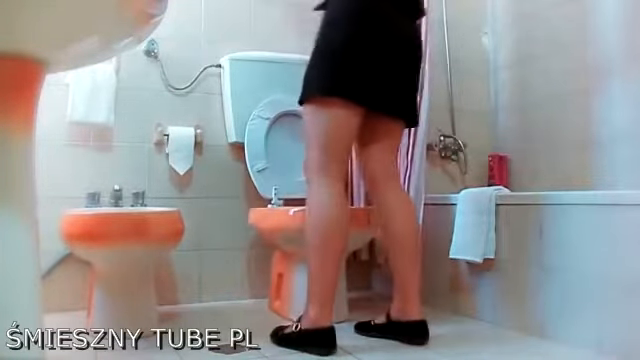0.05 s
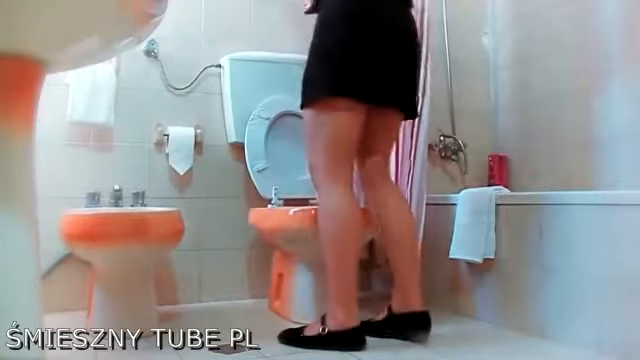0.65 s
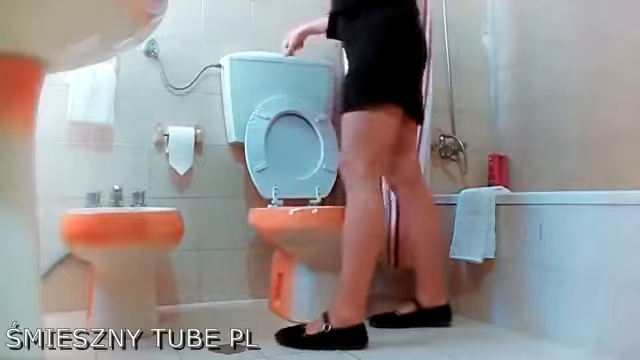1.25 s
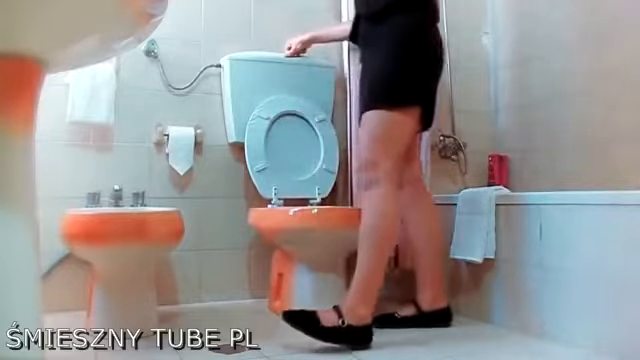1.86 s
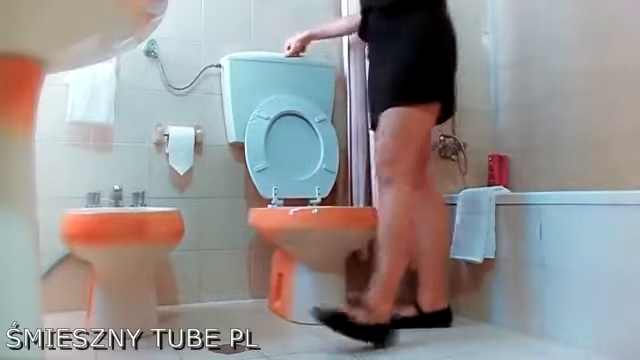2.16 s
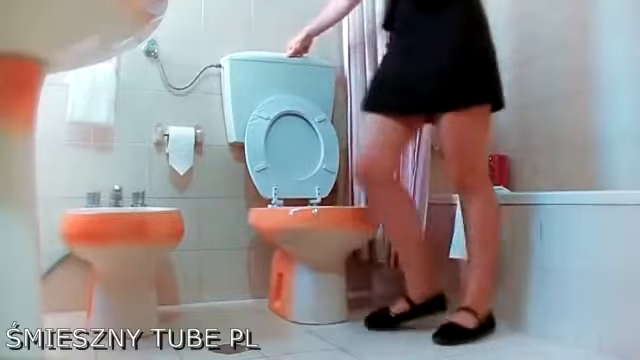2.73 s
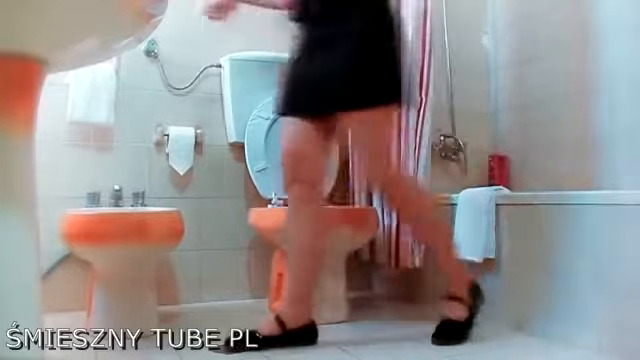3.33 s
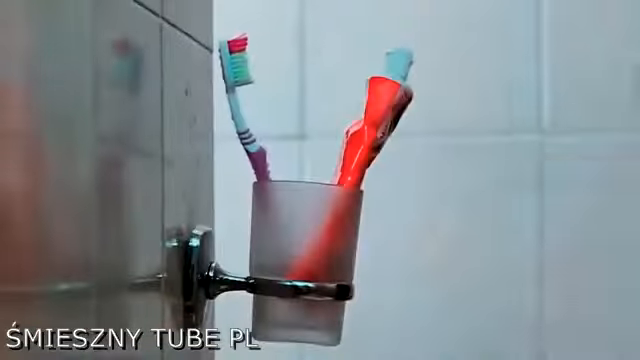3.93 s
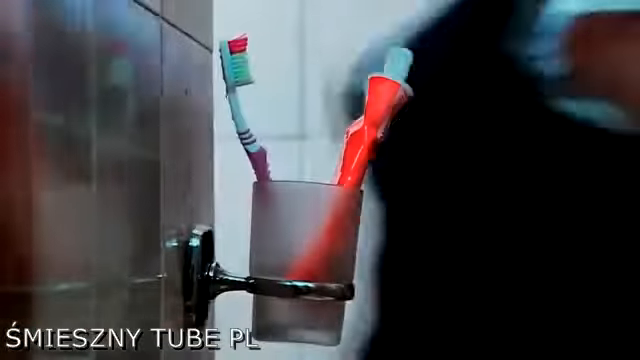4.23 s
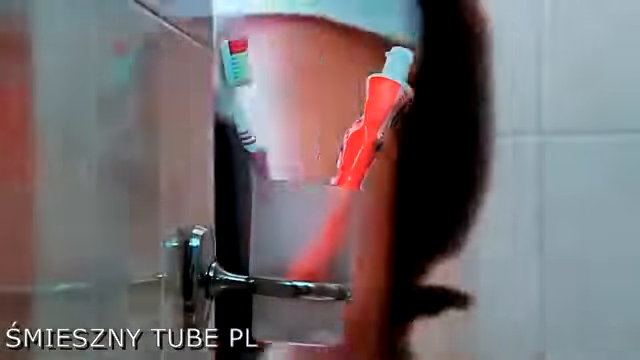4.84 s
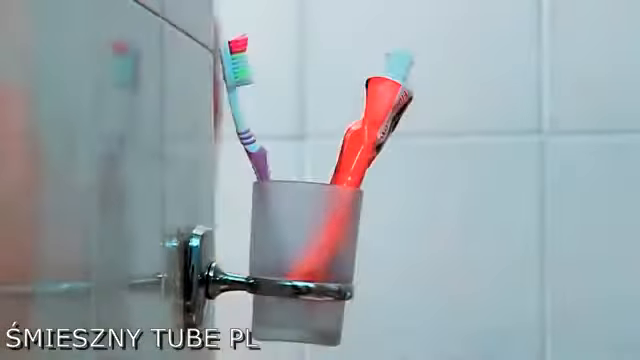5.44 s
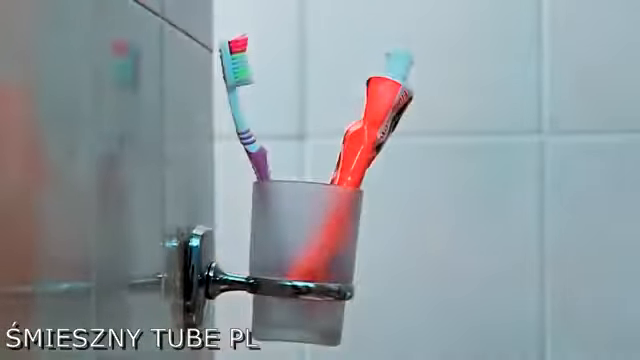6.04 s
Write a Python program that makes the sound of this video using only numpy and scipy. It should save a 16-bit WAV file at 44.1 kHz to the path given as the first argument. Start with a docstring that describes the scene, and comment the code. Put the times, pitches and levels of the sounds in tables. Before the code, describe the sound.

In a small tiled bathroom, faint rustles and a few soft footsteps come first. The toilet mechanism knocks and water surges down the pipe with a hiss and hollow glugs. It crashes into the bowl, splashing and gurgling loudly, then slowly eases while still running. Midway something hard clinks several times in quick succession, and a few more steps thud. The microphone is in the room, picking up a short echo.

```python
"""Small tiled bathroom: a toilet flush. The cistern valve knocks open; water and trapped air surge down
the pipe and ring its resonances. The flow crashes into the bowl, where ringing bubbles and turbulent
noise make gurgles, splashes and spray that swell and slowly ease.
Soft footsteps thud through the floor; something hard clinks briefly."""
import sys
import numpy as np
from scipy import signal
from scipy.fft import rfft, irfft, next_fast_len
from scipy.io import wavfile
from scipy.ndimage import map_coordinates

SR = 44100
rng = np.random.default_rng(int(sys.argv[2]) if len(sys.argv) > 2 else 0)


def persist_wave(psi):
    """Save psi, clipped to +-1, as 16-bit WAV."""
    counts = np.round(np.clip(psi, -1, 1) * 32767).astype(np.int16)
    wavfile.write(sys.argv[1], SR, np.atleast_2d(counts).T)


N = 267862

# tiled room decay (frequency [Hz], t60 [s])
ROOM_T60 = [(150, 0.42), (1000, 0.57), (5000, 0.14), (14000, 0.093)]
# direct sound (frequency [Hz], power share [0-1])
DIRECT_SHARE = [(100, 0.1), (300, 0.37), (1200, 0.39), (3000, 0.41), (7000, 0.14), (14000, 0)]
# microphone treble mismatch (frequency [Hz], left minus right [dB])
MIC_BALANCE = [(700, 0), (3800, 1), (4800, -1), (6000, 1), (7300, -4), (9200, 1.5), (10700, -6.5),
               (12000, -8), (13200, -6), (14200, 3)]
# rustle spectrum (frequency [Hz], density [dB])
RUSTLE_SPECTRUM = [(30, -9), (70, -12), (170, -4), (310, -4), (450, -8.5), (1200, -10), (2200, -13),
                   (5000, -17.5), (10000, -22), (12500, -30), (14000, -53.5)]
# soft rustles (peak time [s], level [dB], half-width [s])
RUSTLE_SWELLS = [(.04, -57, 0.17), (.088, -52, 0.055), (.42, -57.5, 0.1), (.95, -57, 0.088),
                 (1.2, -55.5, 0.15)]
# floor modes (frequency [Hz], width [Hz], gain [dB])
FLOOR_MODES = [(48, 20, 3), (92, 17, 9), (142, 29, -4.5), (203, 74, -14.5)]
# footsteps (time [s], level [dB], attack [s], scuff [dB], deep bass [dB])
FOOTFALLS = [(0.692, -26.5, 0.0048, -21.5, -6), (0.908, -40, 0.0054, -29, -12), (1.22, -24, 0.01, -20, 0),
             (2.221, -43, 0.013, -9, 10), (2.796, -22.5, 0.021, -18, 3), (3.301, -24.5, 0.015, -30, 3),
             (4.421, -24.5, 0.0078, -29, 3), (5.294, -21.5, 0.022, -29, -1)]
# shoe on tile (time [s], level [dB])
SHOE_TAPS = [(0.185, -45.5), (0.721, -55), (0.909, -42), (0.948, -50), (1.122, -51), (1.257, -42),
             (1.375, -36)]
# hard contacts (time [s], level [dB], pitch [Hz], t60 [s])
CLINK_HITS = [(3.835, -10.5, 2447, 0.051), (3.848, -6.5, 6770, 0.074), (3.857, -13, 2470, 0.057),
              (3.893, -25, 6740, .25), (3.904, -13, 2430, 0.12), (3.925, -21.5, 6740, 0.29),
              (3.981, -15.5, 2484, 0.084)]
# flush mechanism (time [s], level [dB], body gain [dB])
VALVE_KNOCKS = [(1.449, -37.5, 14), (1.611, -26, -25), (2.160, -25.5, -13), (2.252, -19.5, -7),
                (2.281, -20, -18)]
# valve stages, main one last (time [s], opening [s], pipe [dB], rush [dB], hiss [dB])
VALVE_GUSHES = [(1.2, 0.21, -41, -48, -61), (1.437, 0.012, -35.5, -41, -35), (1.609, 0.0071, -34, -26, -30)]
# air modes of the pipe (frequency [Hz], width [Hz], gain [dB])
PIPE_MODES = [(209.6, 23, -15), (268, 16, 2), (388, 150, -10), (628, 30, -15), (986, 99, -1),
              (1680, 160, -24), (2420, 130, -27)]
# pipe surge spectrum (frequency [Hz], density [dB])
SURGE_SPECTRUM = [(71, -53), (120, -23), (156, -13), (280, -2), (323, -25), (403, -7), (629, -3),
                  (754, -32), (961, -22), (1280, -10), (1630, -7.5), (4650, -21.5), (7550, -15.5),
                  (13000, -23.5), (15000, -31)]
# low, middle and high glug notes (frequency [Hz], width [Hz])
GLUG_MODES = [(275, 72), (628, 39), (965, 80)]
# air going back up the pipe (time [s], low note [dB], middle note [dB], high note [dB])
PIPE_GLUGS = [(1.439, -44, -34, -32.5), (1.485, -40, -43, -39), (1.629, -36, -39, -30),
              (1.685, -35, -49, -25.5), (1.765, -26.5, -32, -24.5), (1.795, -41, -29, -39),
              (1.835, -36, -29, -25.5), (1.885, -44, -27.5, -26), (1.994, -35.5, -34, -54),
              (2.035, -40, -55, -57), (2.1, -47, -28, -48), (2.15, -46, -27, -50), (2.35, -50, -35, -37),
              (2.446, -42, -28, -32), (2.675, -67, -33.5, -49)]
# water slaps (time [s], level [dB], pitch [Hz], swell [s], droplet share [0-1])
WATER_SLAPS = [(1.845, -28.5, 4650, 0.0054, 0.96), (2.02, -40.5, 3540, 0.0026, 0.3),
               (2.122, -36, 2650, 0.0033, 0.6), (2.232, -29, 2230, 0.0042, 0.3),
               (2.307, -33, 2770, 0.0042, 0), (2.336, -33, 4900, 0.0052, .8),
               (2.392, -33, 1620, 0.0039, 0.7), (2.405, -30, 4300, 0.0025, 0.6),
               (2.453, -33, 3400, 0.0042, 0.7), (2.532, -26, 3730, 0.0011, 0.5),
               (2.573, -27.5, 2070, 0.0063, 0.44), (2.652, -26, 1417, 0.0052, 0.26),
               (2.708, -31.5, 888, 0.0055, 0), (2.736, -28, 7770, 0.0043, 0.2),
               (2.775, -24, 4220, 0.0077, 0.7), (2.856, -23.5, 1470, 0.0055, 0.4),
               (2.882, -28, 5000, 0.0018, 0.4), (2.901, -23.5, 2580, 0.0057, 0.3),
               (2.953, -23.5, 4590, 0.004, 0.7), (2.956, -28, 885, 0.0031, 0.7),
               (2.999, -23, 6540, 0.0059, 0.86), (3.077, -24, 880, 0.0041, 0),
               (3.118, -22.5, 1100, .008, 0.1), (3.188, -23, 1405, 0.0044, 0.12),
               (3.272, -19, 3360, 0.0084, 1), (3.376, -23, 2286, 0.0059, 0.65),
               (3.506, -23, 1484, 0.0028, 0.9), (3.615, -25.5, 810, 0.0021, 0.23),
               (3.617, -29, 3540, 0.0005, 1), (3.648, -29, 2430, 0.002, 0.2),
               (3.752, -23.5, 2005, 0.0027, 0.7), (3.82, -19.5, 3880, 0.0093, 0.8),
               (3.916, -24.5, 1720, 0.00068, 1), (3.95, -25, 780, 0.0054, 0),
               (4.044, -33, 1260, 0.0018, 0.2), (4.248, -21.5, 974, 0.0067, 0),
               (4.303, -23, 2460, 0.0061, 0.2), (4.351, -25, 2010, 0.0028, 0.14),
               (4.427, -23.5, 8140, 0.0025, 0.7), (4.473, -27, 1210, 0.0036, 0.3),
               (4.613, -29, 950, 0.0024, 0.12), (4.651, -26.5, 2040, 0.0022, 0.46),
               (4.728, -28, 1870, 0.0021, 0.03), (4.7975, -23, 1950, 0.0017, 0),
               (4.822, -28, 990, 0.0033, 0.01), (4.964, -24, 980, 0.0056, 0.02),
               (5.007, -32, 5540, 0.003, 0.5), (5.313, -28.5, 2540, 0.0024, 0.9),
               (5.406, -28, 7070, 0.0018, 0.8), (5.493, -23.5, 1186, 0.0012, 0.3),
               (5.553, -28, 2295, 0.0047, 0.54), (5.583, -26, 1110, 0.0023, 0),
               (5.688, -27.5, 4050, 0.0052, 1), (5.997, -36, 2300, 0.002, 0.5)]
# flow into the bowl (time [s], level [dB])
BOWL_FLOW = [(2.3, -31), (2.36, -31), (2.75, -24), (2.94, -23), (3.24, -20), (3.75, -21), (5.14, -28),
             (5.63, -27), (5.93, -30), (6.07, -29.5)]
# bowl water spectrum (frequency [Hz], density [dB])
BOWL_SPECTRUM = [(100, -49), (250, -25.5), (300, -9), (450, -11), (650, -7), (950, -4.5), (1250, -1.5),
                 (1550, -2.5), (2200, -1.5), (3200, -2.5), (5000, -5), (9000, -9.5), (13300, -14),
                 (15000, -33)]
# standing waves of bowl and corner (frequency [Hz], width [Hz], gain [dB])
BOWL_MODES = [(298.5, 19, 0), (395, 50, -11.5), (625, 45, -3.5), (722, 18, -6), (787, 17, 5.5),
              (858, 12, -3.5), (897, 38, 2.5), (988, 15, -2.5), (1080, 5.9, -1), (1210, 18, -18),
              (1220, 12, -3), (1268, 17, -6), (1702, 18, -4.5), (1874, 14, -2), (1968, 24, -2.5),
              (2214, 31, -1), (2386, 22, 3), (2440, 63, -13)]
# drain swallowing air (time [s], level [dB])
DRAIN_GULPS = [(2.5, -38.5), (2.96, -51), (3.19, -34.5), (3.33, -29.5), (3.85, -28), (4.05, -35),
               (4.23, -32.5), (4.51, -37), (4.7, -53), (4.88, -53), (5.1, -39.5), (5.45, -45), (5.87, -43)]
# bursts of large bubbles (time [s], level [dB])
POOL_BOILS = [(3.07, -22), (3.37, -23), (3.46, -23.5), (3.93, -33), (4.22, -27), (4.42, -40), (4.59, -30),
              (4.67, -31.5), (4.82, -31), (4.93, -28.5), (5.48, -29.5), (5.58, -32.5)]
# water sheets bursting into spray (time [s], level [dB])
SPRAY_SPURTS = [(2.28, -46), (3.76, -25), (3.83, -23), (4.39, -28), (4.42, -34), (4.89, -34), (4.98, -31.5),
                (5.41, -38), (5.68, -43)]

# envelopes (attack [s], hold [s], fall [dB/s])
RUMBLE_ENV, BUMP_ENV = (0.077, 0.3, 0.74), (0.081, 0.036, 114)
HISS_ENV, RUSH_ENV, PIPE_ENV = (0.0023, 0.0065, 46), (0.022, 0.02, 24.7), (0.12, 0.15, 16.3)
WHOOSH_ENV, GLUG_ENV, NOTE_ENV = (0.057, 0.046, 63), (0.013, 0.0056, 177), (0.036, 0.5, 40)
GULP_ENV, BOIL_ENV, SPURT_ENV = (0.013, 0.0036, 107), (0.013, 0.043, 190), (0.0062, 0.0083, 150)
# bowl voices (level re flow [dB], offset while shallow [dB], drift [dB/s])
GURGLE, BUBBLING = (-20, -27, -0.63), (-4.5, -6, 0.7)
SPLASH, SPRAY = (-0.5, -1.6, -0.59), (-6.5, -0.3, -0.29)

MAIN_GUSH_S, TOP_HZ = VALVE_GUSHES[-1][0], 14900
TIME_S = np.arange(N) / SR


def amp(db):
    return 10 ** (np.asarray(db) / 20)


def unit(x):
    """Scale to rms 1 of the channel mean."""
    return x / np.sqrt(np.mean(np.atleast_2d(x).mean(0) ** 2) + 1e-20)


def along(points, hz):
    """Interpolate on a log frequency axis."""
    knots_hz, values = np.transpose(points)
    return np.interp(np.log(hz + 1), np.log(knots_hz), values)


def wobble(rate_hz):
    """Smooth random curve."""
    return map_coordinates(rng.standard_normal(4096), [TIME_S * rate_hz], mode="mirror")


def filtered(x, response):
    """Apply response(hz) by FFT."""
    n = x.shape[-1]
    padded = next_fast_len(n + SR // 4)
    return irfft(rfft(x, padded) * response(np.fft.rfftfreq(padded, 1 / SR)), padded)[..., :n]


def band(hz, lo_hz, hi_hz):
    """Steep band-pass gain."""
    return ((1 + (lo_hz / (hz + 1)) ** 10) * (1 + (hz / hi_hz) ** 10)) ** -.5


def coloured_band(x, colour, lo_hz, hi_hz):
    """One band of x, shaped by colour(hz), rms 1."""
    return unit(filtered(x, lambda hz: colour(hz) * band(hz, lo_hz, hi_hz)))


def resonances(hz, modes):
    """Causal response of modes with alternating signs."""
    return sum((-1) ** k * amp(db) * 1j * hz * width_hz / (mode_hz ** 2 - hz ** 2 + 1j * hz * width_hz)
               for k, (mode_hz, width_hz, db) in enumerate(modes))


def add(track, start_s, sound):
    span = track[..., round(start_s * SR):][..., :sound.shape[-1]]
    span += sound[..., :span.shape[-1]]


def ramp(start_s, length_s):
    return np.clip((TIME_S - start_s) / length_s, 0, 1)


def swell(start_s, envelope):
    """Linear attack, hold, exponential fall."""
    attack_s, hold_s, fall_db_per_s = envelope
    falling_s = np.maximum(0, TIME_S - start_s - attack_s - hold_s)
    return ramp(start_s, attack_s) * amp(-fall_db_per_s * falling_s)


def swells(events, envelope):
    """Power sum of one swell per (time [s], level [dB])."""
    return np.sqrt(sum((amp(db) * swell(start_s, envelope)) ** 2 for start_s, db in events))


def blend(direct, diffuse):
    """Mono direct sound plus stereo diffuse sound, which rules the treble."""
    share = lambda hz: np.clip(along(DIRECT_SHARE, hz), .01, .99)
    centre = filtered(direct, lambda hz: np.sqrt(share(hz)))
    return centre + filtered(diffuse, lambda hz: np.sqrt(1 - share(hz)))


def room(x, wet_db, early_gain=1.04, early_s=0.078):
    """Mono to stereo: direct sound, dense early reflections off near walls, tail."""
    hz, t, spectrum = signal.stft(rng.standard_normal((2, SR // 3)), SR, nperseg=256)
    decay = amp(-60 * t / along(ROOM_T60, hz)[:, None])
    spectrum = spectrum * decay * (1 + early_gain * np.exp(-t / early_s))
    spectrum /= np.sqrt(np.mean(abs(spectrum) ** 2, axis=(0, 2), keepdims=True))
    tail = signal.istft(spectrum, SR, nperseg=256)[1]
    tail /= np.linalg.norm(tail, axis=1, keepdims=True)
    return blend(x, amp(wet_db) * signal.oaconvolve(x[None], tail, axes=1)[:, :N])


def wash():
    """White stereo noise filling the room."""
    return blend(rng.standard_normal(N), rng.standard_normal((2, N)))


def background(hiss_db=-68, rumble_db=-60.5, bump_s=3.77, bump_db=-32.5):
    """Room hiss, faint rustles, pipe rumble from the main gush on, one heavy bump."""
    noise = wash()
    air = unit(filtered(noise, lambda hz: amp(along(RUSTLE_SPECTRUM, hz))))
    rumble = unit(filtered(noise, lambda hz: band(hz, 18, 290) / np.sqrt(1 + hz / 150)))
    rustle_power = sum(amp(db) ** 2 * np.exp(-((TIME_S - peak_s) / width_s) ** 2)
                       for peak_s, db, width_s in RUSTLE_SWELLS)
    running = amp(rumble_db) * swell(MAIN_GUSH_S, RUMBLE_ENV)
    bump = amp(bump_db) * swell(bump_s, BUMP_ENV)
    return air * np.sqrt(rustle_power + amp(hiss_db) ** 2) + rumble * (running + bump)


def footsteps(push_hz=115, push_life_s=0.0054, boom_life_s=0.047, scuff_rise_s=0.01, scuff_life_s=0.075):
    """A soft sole pushes once; the floor booms on while the shoe settles with a muffled scuff."""
    track, t = np.zeros((2, N)), np.arange(SR // 2) / SR
    muffled = lambda hz: (band(hz, 480, 1460) + amp(-15.5) * band(hz, 1700, 13000)) / np.sqrt(1 + hz / 400)
    floor = lambda hz: resonances(hz, FLOOR_MODES) * band(hz, 20, 250)
    for start_s, db, attack_s, scuff_db, bass_db in FOOTFALLS:
        push = amp(4.5) * np.exp(-t / push_life_s) * np.sin(2 * np.pi * push_hz * t)
        shake = rng.standard_normal((2, len(t))) + 0.24 * rng.standard_normal(len(t))
        boom = unit(filtered(shake, lambda hz: floor(hz) * amp(bass_db / (1 + (hz / 70) ** 6))))
        boom *= amp(-5.5) * np.exp(-t / boom_life_s)
        scuff = unit(filtered(rng.standard_normal((2, len(t))), muffled))
        scuff *= amp(scuff_db) * (1 - np.exp(-t / scuff_rise_s)) * np.exp(-t / scuff_life_s)
        add(track, start_s, amp(db) * (1 - np.exp(-t / attack_s)) * (push + boom + scuff))
    return track


def taps(life_s=0.013, lo_hz=230, hi_hz=1200):
    """A shoe taps the tiles: short, dull knocks."""
    track, t = np.zeros(N), np.arange(SR // 10) / SR
    for start_s, db in SHOE_TAPS:
        knock = coloured_band(rng.standard_normal(len(t)), lambda hz: 1 / (1 + hz / lo_hz), lo_hz, hi_hz)
        add(track, start_s, amp(db) * np.exp(-t / life_s) * knock)
    return track


def clinks(attack_s=0.0005):
    """Small hard contacts, each ringing on one mode."""
    track, t = np.zeros(N), np.arange(SR // 4) / SR
    for start_s, db, hz, t60_s in CLINK_HITS:
        envelope = amp(db - 60 * t / t60_s) * (1 - np.exp(-t / attack_s))
        add(track, start_s, envelope * np.sin(2 * np.pi * hz * t))
    return track


def valve(tick_life_s=0.0025, body_life_s=0.0046):
    """The mechanism ticks and knocks on the hollow cistern."""
    track, t = np.zeros(N), np.arange(SR // 20) / SR
    for start_s, db, body_db in VALVE_KNOCKS:
        tick_noise, body_noise = rng.standard_normal((2, len(t)))
        tick = filtered(tick_noise * np.exp(-t / tick_life_s), lambda hz: band(hz, 2100, 16000))
        body = unit(filtered(body_noise, lambda hz: resonances(hz, PIPE_MODES)))
        add(track, start_s, amp(db) * (tick + amp(body_db) * body * np.exp(-t / body_life_s)))
    return track


def bubbles(lo_hz, hi_hz, life_cycles, spread_db, rise, count):
    """Swarm of ringing bubbles, mostly weak; rise lifts each pitch as it dies."""
    when, pitch, size, sign = rng.random((count, 4)).T
    hz = (np.sqrt(lo_hz) + pitch * (np.sqrt(hi_hz) - np.sqrt(lo_hz))) ** 2
    strength = hz ** .75 * np.sign(sign - .5)  # even power per Hz
    strength *= amp(-spread_db * np.log(np.maximum(size, .01)))
    lengths = (np.pi * life_cycles * SR / hz).astype(int)
    age_samples = np.arange(lengths.sum()) - np.repeat(np.cumsum(lengths) - lengths, lengths)
    turns = (np.repeat(hz / SR, lengths) * age_samples).astype(np.float32)
    envelope = np.exp(-turns / life_cycles) * (1 - np.exp(-2 * turns))
    ring = envelope * np.sin(2 * np.pi * turns * (1 + rise * turns / life_cycles))
    positions = np.repeat((when * N).astype(int), lengths) + age_samples
    return unit(np.bincount(positions, np.repeat(strength, lengths) * ring, N)[:N])


def water(swarm, wash_db, churn_db, wet_db, jet_share=0.46):
    """Bubbles over turbulent noise, in quick clumps; the jet comes from one spot and excites the room."""
    wash_gain = amp(wash_db)
    jet = wash_gain * np.sqrt(jet_share) * rng.standard_normal(N)
    mix = room(swarm + jet, wet_db) + wash_gain * np.sqrt(1 - jet_share) * wash()
    clumps = amp(churn_db * (wobble(40) + wobble(170)))
    return clumps * mix / np.sqrt(1 + wash_gain ** 2)


def glugs(note_s=2.066, note_db=-38, flutter_db=1, flutter_hz=130):
    """Air pockets flutter up the pipe and stir three modes; running water sustains the middle one."""
    times_s, *levels_db = np.transpose(PIPE_GLUGS)
    notes = [coloured_band(wash(), lambda hz: resonances(hz, [(mode_hz, width_hz, 0)]),
                           mode_hz - 2 * width_hz, mode_hz + 2 * width_hz)
             for mode_hz, width_hz in GLUG_MODES]
    low, middle, high = [swells(zip(times_s, column), GLUG_ENV) for column in levels_db]
    middle = np.hypot(middle, amp(note_db) * swell(note_s, NOTE_ENV))
    flutter = unit(amp(flutter_db * wobble(flutter_hz)))
    return flutter * sum(gain * note for gain, note in zip((low, middle, high), notes))


def whoosh(level_db=-27, from_hz=5400, to_hz=1280, slide_s=0.058, width_oct=0.38):
    """Front of the main gush: a broad resonance slides down as the pipe fills."""
    hz, t, spectrum = signal.stft(wash(), SR, nperseg=512)
    centre_hz = to_hz + (from_hz - to_hz) * np.exp(-np.maximum(t - MAIN_GUSH_S, 0) / slide_s)
    gain = np.exp(-.5 * (np.log2((hz[:, None] + 1) / centre_hz) / width_oct) ** 2) / np.sqrt(centre_hz)
    sweep = unit(signal.istft(spectrum * gain, SR, nperseg=512)[1][:, :N])
    return amp(level_db) * swell(MAIN_GUSH_S, WHOOSH_ENV) * sweep


def gushes(levels_db, envelope):
    """Joint gain of the valve stages; slower opening, longer rise."""
    attack_s, *hold_and_fall = envelope
    return np.sqrt(sum((amp(db) * swell(start_s, (opening_s + attack_s, *hold_and_fall))) ** 2
                       for (start_s, opening_s, *_), db in zip(VALVE_GUSHES, levels_db)))


def cistern(low_modes_db=-17.5):
    """Water and trapped air run down the pipe: each gush hisses at once, then rings the pipe."""
    *_, pipe_db, rush_db, hiss_db = np.transpose(VALVE_GUSHES)
    swarm = bubbles(184.6, 12840, life_cycles=7.7, spread_db=1.5, rise=0.046, count=2800)
    flow = water(swarm + amp(4) * rng.standard_normal(N), wash_db=2, churn_db=-1.23, wet_db=1)
    colour = lambda hz: amp(along(SURGE_SPECTRUM, hz))
    hollow = lambda hz: resonances(hz, PIPE_MODES) + amp(-3.5)
    low = amp(low_modes_db) * coloured_band(flow, hollow, 94, 410)
    drone = gushes(pipe_db, PIPE_ENV) * (low + coloured_band(flow, hollow, 430, 1400))
    rush = gushes(rush_db, RUSH_ENV) * coloured_band(flow, colour, 1450, 5400)
    hiss = gushes(hiss_db, HISS_ENV) * coloured_band(flow, colour, 4500, 17000)
    return drone + rush + hiss + whoosh() + glugs()


def slaps(rise_per_s=1.4, pitch_scatter=0.366, life_cycles=4.1, count=70):
    """Lumps of water land: one trapped bubble rings, droplets patter around its pitch."""
    track, t = np.zeros(N), np.arange(SR // 16) / SR
    for start_s, db, hz, swell_s, share in WATER_SLAPS:
        bubble = t * np.exp(-t / (0.8 * swell_s)) * np.sin(2 * np.pi * hz * t * (1 + rise_per_s * t))
        age_s = np.maximum(t - swell_s * rng.gamma(3, .5, (count, 1)), 0)
        pitch, size = rng.standard_normal((2, count, 1))
        turns = np.minimum(hz * np.exp(pitch_scatter * pitch), TOP_HZ) * age_s
        droplets = (size * np.exp(-turns / life_cycles) * np.sin(2 * np.pi * turns)).sum(0)
        slap = np.sqrt(1 - share) * unit(bubble) + np.sqrt(share) * unit(droplets)
        add(track, start_s, amp(db) * slap)
    return track


def bowl(arrival_s=2.179, rise_s=0.12, deep_s=2.87, fill_s=0.32, slosh_db=0.8, slosh_hz=13):
    """Air pockets gurgle and bubble as the pool deepens; breaking water splashes and sprays."""
    flow_db = np.interp(TIME_S, *np.transpose(BOWL_FLOW))
    shallow = 1 - ramp(deep_s, fill_s)

    def voice_gain(db, shallow_db, drift_db_per_s):
        level_db = flow_db + db + shallow_db * shallow + drift_db_per_s * (TIME_S - deep_s)
        return ramp(arrival_s, rise_s) * amp(level_db + slosh_db * wobble(slosh_hz))

    boil = swells(POOL_BOILS, BOIL_ENV)
    gurgle = np.hypot(voice_gain(*GURGLE), swells(DRAIN_GULPS, GULP_ENV))
    bubbling = np.hypot(voice_gain(*BUBBLING), boil)
    splash = np.hypot(voice_gain(*SPLASH), amp(-13.5) * boil)
    spray = np.hypot(voice_gain(*SPRAY), swells(SPRAY_SPURTS, SPURT_ENV))

    swarm = bubbles(271.6, 3612, life_cycles=10, spread_db=3.3, rise=0.021, count=3600)
    droplets = bubbles(3085, 13750, life_cycles=4.2, spread_db=4, rise=0, count=7000)
    pops = bubbles(663, 3010, life_cycles=5.3, spread_db=2.2, rise=0.074, count=380)
    ringing = amp(-8.5) * swarm + amp(-11) * pops + amp(-1.5) * droplets
    wash_db = np.interp(TIME_S, [arrival_s, deep_s], [-6.5, 2.2])  # more turbulence with depth
    flow = water(ringing, wash_db, churn_db=0.57, wet_db=-0.5)
    flow = filtered(flow, lambda hz: 1 + sum(resonances(hz, [mode]) for mode in BOWL_MODES))
    colour = lambda hz: amp(along(BOWL_SPECTRUM, hz))
    return (gurgle * coloured_band(flow, colour, 150, 500)
            + bubbling * coloured_band(flow, colour, 610, 1380)
            + splash * coloured_band(flow, colour, 1630, 4600)
            + spray * coloured_band(flow, colour, 5400, 16000))


def scene():
    """All sources in the tiled room; valve and clinks arrive mostly direct."""
    clicks = valve() + clinks()
    clicks = clicks + amp(-10) * room(clicks, wet_db=0)
    knocks = room(slaps() + taps(), wet_db=-4.3)
    return cistern() + bowl() + clicks + knocks + footsteps() + background()


def record(dry):
    """Treble colour per microphone, soft peak limit, low-pass."""
    ceiling = 0.88
    coloured = filtered(dry, lambda hz: amp(np.outer([.5, -.5], along(MIC_BALANCE, hz))))
    limited = coloured / (1 + abs(coloured / ceiling) ** 6) ** (1 / 6)
    return filtered(limited, lambda hz: hz < TOP_HZ)


dry = scene()
out = record(dry)
persist_wave(out)
```